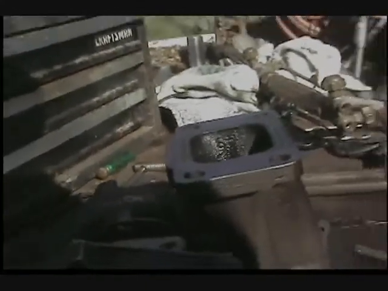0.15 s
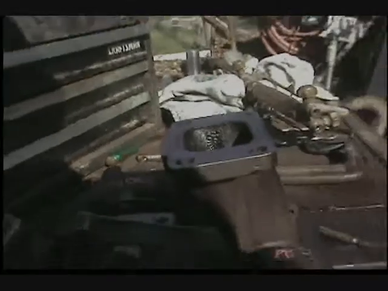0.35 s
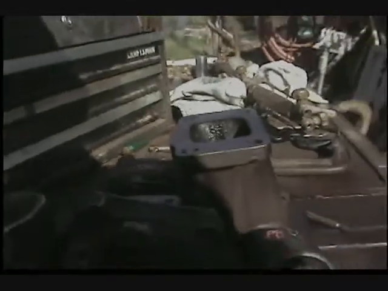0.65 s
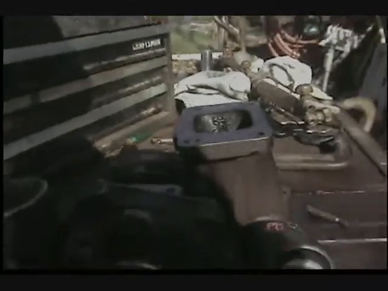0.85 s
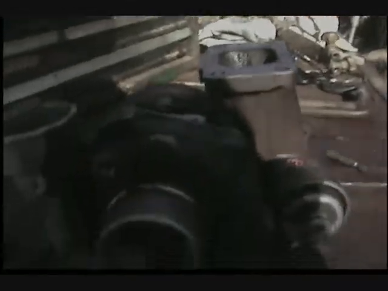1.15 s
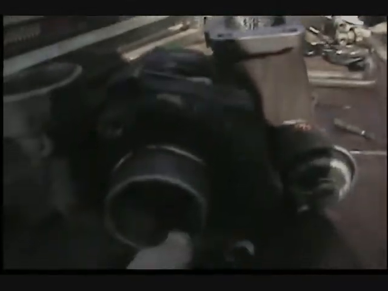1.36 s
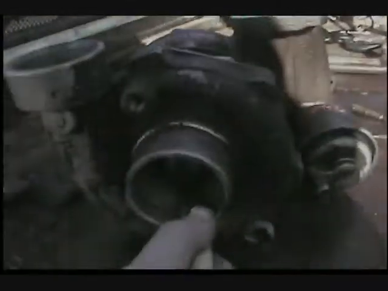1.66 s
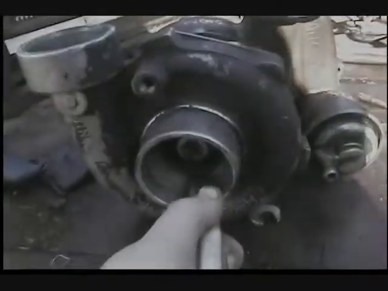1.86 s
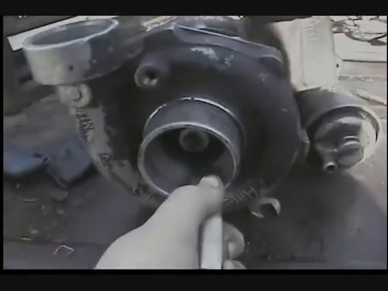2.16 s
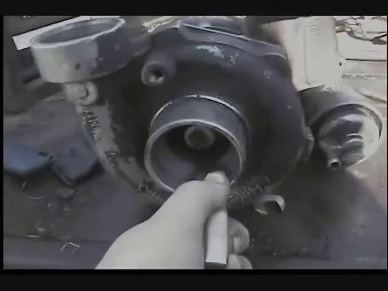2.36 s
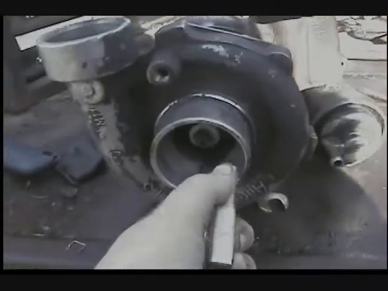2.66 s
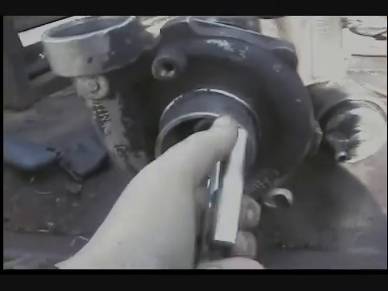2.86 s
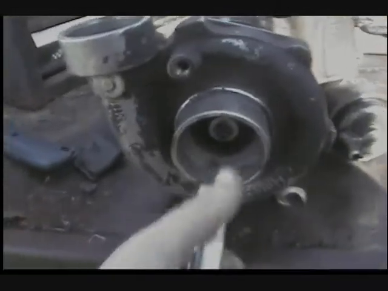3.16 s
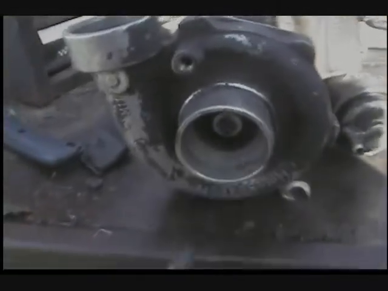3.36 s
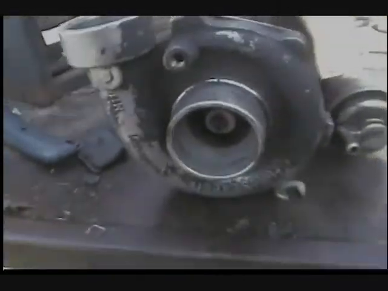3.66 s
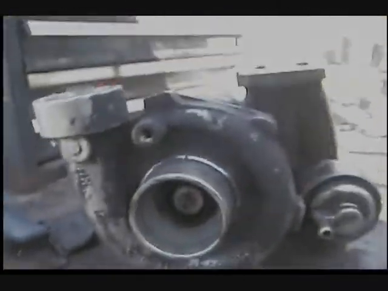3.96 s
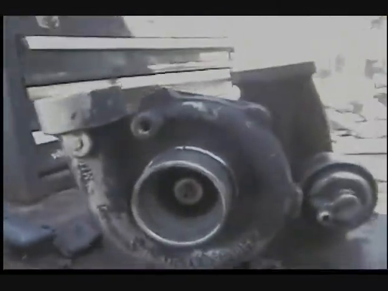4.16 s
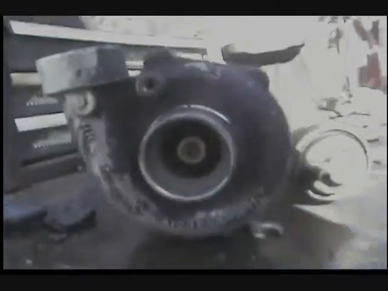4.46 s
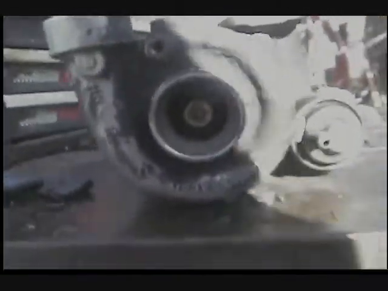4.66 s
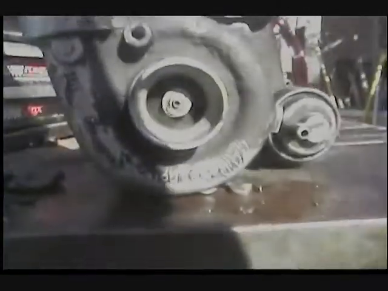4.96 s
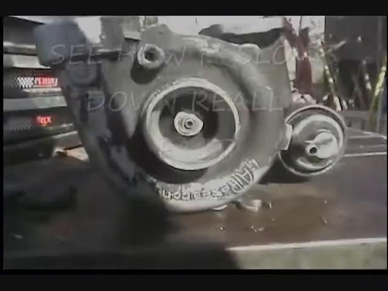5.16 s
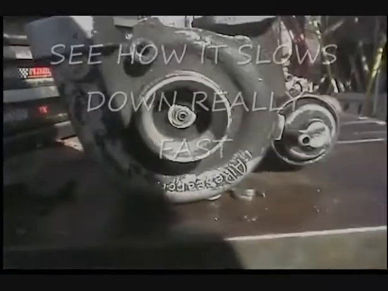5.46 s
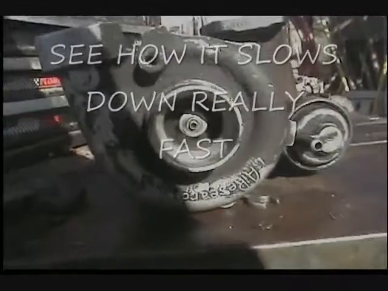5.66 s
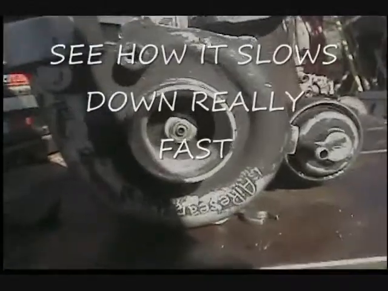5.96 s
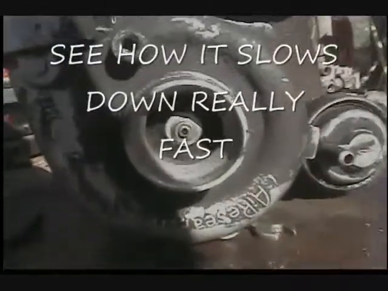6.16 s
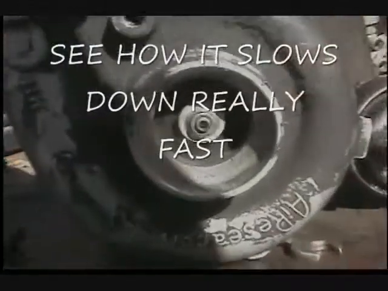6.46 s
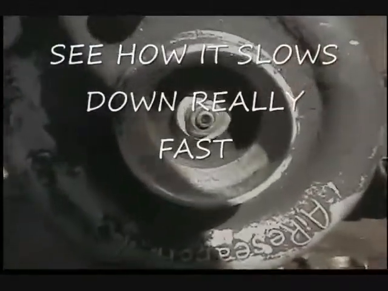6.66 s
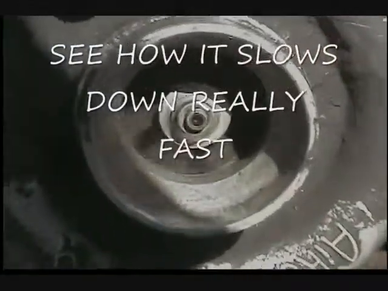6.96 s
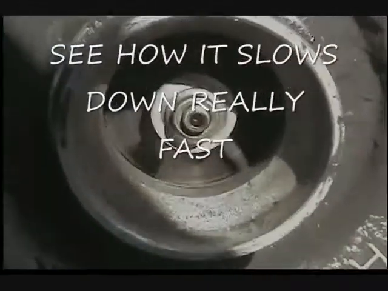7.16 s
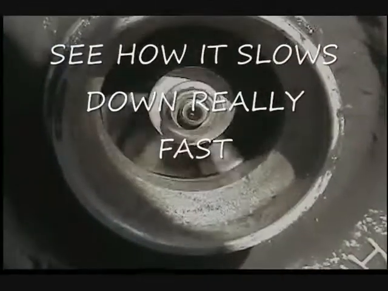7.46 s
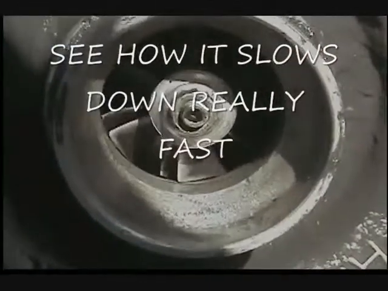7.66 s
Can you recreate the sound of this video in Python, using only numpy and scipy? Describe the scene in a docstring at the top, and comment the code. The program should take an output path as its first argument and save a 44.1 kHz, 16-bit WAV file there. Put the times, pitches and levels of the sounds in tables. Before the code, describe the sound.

Loud compressed-air hiss roars into a humming metal turbocharger wheel, cuts off abruptly, then a clattering piston compressor grows louder, with occasional sharp ticks.

```python
"""Air gun on a turbocharger wheel

A motor-driven piston compressor runs across the yard: knocks repeat every turn, valve plates ring, noise
swells on the strokes, and the motor hums. Close to the camera an air gun hisses and roars into a
turbocharger wheel, whose hum slowly falls, until the gun is shut off. The camera's gain control, pulled
down by the hiss, climbs back afterwards. A few sharp ticks pass over the hum.
"""
import sys
import numpy as np
from scipy import signal
from scipy.fft import rfft, irfft, next_fast_len
from scipy.io import wavfile
from scipy.ndimage import uniform_filter1d, map_coordinates

SR = 44100
rng = np.random.default_rng(int(sys.argv[2]) if len(sys.argv) > 2 else 0)


def dump(signal):
    """Clip the signal to [-1, 1] and save it as 16-bit WAV at the path in sys.argv[1]."""
    limited = np.clip(np.atleast_2d(signal).T, -1, 1)
    pcm = np.round(limited * 32767).astype(np.int16)
    wavfile.write(sys.argv[1], SR, pcm)


def makeup_ratio(level_db):
    """Linear amplitude ratio for a level in decibels (20 dB per factor of ten)."""
    decades = np.asarray(level_db, float) / 20
    return 10 ** decades


N = 344421


def unit(x):
    """Scale to rms 1."""
    return x / np.sqrt(np.mean(x ** 2) + 1e-20)


def along(points, hz):
    """Read (Hz, value) points on a log frequency axis."""
    f, v = np.transpose(points)
    return np.interp(np.log(hz + 1), np.log(f + 1), v)


def curves(rows):
    """One value per sample for each column after the time."""
    s, *columns = np.transpose(rows)
    return [np.interp(np.arange(N) / SR, s, column) for column in columns]


def wobble(rate):
    """A smooth random curve through normally distributed knots, rate of them a second."""
    knots = rng.standard_normal(int(N * rate / SR) + 4)
    return map_coordinates(knots, [np.arange(N) * rate / SR])


def filtered(x, response):
    """Multiply the spectrum of x by a response of frequency."""
    m = next_fast_len(N + 8192)
    return irfft(rfft(x, m) * response(np.fft.rfftfreq(m, 1 / SR)), m)[..., :N]


def rush(gain, patchy_db):
    """Noise of rms 1 with a colour, and a random gain in patches of time and frequency."""
    z = signal.stft(rng.standard_normal(N), nperseg=512)[2]
    field = uniform_filter1d(rng.standard_normal(z.shape), 6, 0)
    field = unit(uniform_filter1d(field, 10, 1))
    noise = signal.istft(z * makeup_ratio(patchy_db * field), nperseg=512)[1][:N]
    return unit(filtered(noise, gain))


def lifted(spectrum, peaks, lift):
    """A noise colour raised at a few resonances."""
    def response(hz):
        boost = 1 + sum(lift / (1 + ((hz - c) / w) ** 2) for c, w in peaks)
        return makeup_ratio(along(spectrum, hz)) * boost
    return response


# Knocks of piston, pipe and tank, once a turn. Each row: share of a turn (0-1), ring in Hz, t60 in seconds,
# relative level in dB with the camera high, the same with it low (both before the treble tilt).
PUMP_KNOCKS = [(.177, 651, .028, 3.4, 6.6), (.185, 1247, .039, -6.2, -6.6), (.257, 872, .05, -10.8, -1.5),
               (.303, 582, .15, 4.6, 5), (.307, 1144, .012, -.3, 1.4), (.353, 327, .081, 4.8, 5.1),
               (.44, 618, .043, 3.2, 4.4), (.464, 1453, .02, -30, -3.5), (.484, 2470, .05, -30, -14),
               (.604, 366, .124, 5.6, 3.5), (.621, 691, .121, -5.3, -19), (.805, 453, .15, -4.1, -5.8),
               (.861, 1188, .127, -12, -17), (.932, 838, .141, -12.3, -11.2), (.933, 482, .15, -7.6, -7.1),
               (.985, 1541, .077, -13.5, -8.8), (.99, 2470, .05, -30, -14), (.999, 242, .15, -10, -9)]
# Lowest pressure tones. Each row: multiple of shaft speed, level in dB against all the knocks.
PRESSURE_TONES = [(3, -51), (4, -38.5), (5, -47), (6, -33), (7, -37.5)]
# Fine tones of small parts. Each row: frequency in Hz, mean level in dB a tone with the camera low,
# against all the knocks.
FINE_TONES = [(1000, -44), (1150, -38), (1280, -38), (1750, -30.5), (2100, -37.5), (2500, -34.5),
              (2750, -46)]


def pump(turn, view):
    """Every turn repeats the same knocks, each ringing in its own part of the pump."""
    order = np.arange(100)  # multiples of shaft speed
    share, hz, t60, db_high, db_low = np.transpose(PUMP_KNOCKS)[:, :, None]
    tone_hz = order * np.mean(SHAFT_SPEED, 0)[1]
    s, w, damping = 2j * np.pi * tone_hz, 2 * np.pi * hz, np.log(1000) / t60
    rise_s, bass_cut_hz = .0003, 230  # little radiates below the bass cut

    def ring(damping):
        return w / ((s + damping) ** 2 + w * w)

    knock = ring(damping) - ring(damping + 1 / rise_s)
    knock = knock * np.exp(-2j * np.pi * share * order)
    # treble tilt of the knocks: 2.5 dB per kHz
    tilted = (s / (s + 2 * np.pi * bass_cut_hz)) ** 2 * makeup_ratio(2.5 * tone_hz / 1000)
    tilted = tilted * (order > PRESSURE_TONES[-1][0])

    random_phase = np.exp(2j * np.pi * rng.random(len(order)))
    scatter_db = 2.5 * rng.standard_normal(len(order))
    fine = makeup_ratio(along(FINE_TONES, tone_hz) + scatter_db) * (tone_hz > FINE_TONES[0][0])
    deep = sum(makeup_ratio(db) * (order == round(k)) for k, db in PRESSURE_TONES)

    spectra = []
    for db, fine_db in [(db_high, -1), (db_low, 0)]:
        z = tilted * (makeup_ratio(db) * knock).sum(0)
        z = z / np.linalg.norm(z)  # the knocks together have rms 1
        spectra.append(np.sqrt(2) * (z + (deep + makeup_ratio(fine_db) * fine) * random_phase))

    size, out = 4096, 0  # points in the waveform of one turn
    for low, high in [(0, 14), (14, 25), (25, 45), (45, 99)]:  # bands of tones shake on their own
        shaken = (turn + .0007 * wobble(25)) % 1  # strokes differ slightly in timing
        band = (order > low) & (order <= high)
        cycles = [irfft(z * band, size) * size / 2 for z in spectra]
        above, level = (np.interp(shaken, np.arange(size) / size, c, period=1) for c in cycles)
        out = out + makeup_ratio(0.36 * wobble(22)) * ((1 - view) * above + view * level)
    return out


def valves(turn, plates):
    """Each plate strikes its seat once a turn, a little early or late, harder or softer."""
    out, t = np.zeros(N), np.arange(1024) / SR
    count = int(N / SR * 30)  # enough turns for the whole scene
    for share, hz, t60, db in plates:
        chance = rng.standard_normal((count, 2))
        late = .0012 * chance[:, 0]  # in turns
        strike_turn = np.floor(turn[0]) + np.arange(count) + share + late
        at = np.interp(strike_turn, turn, np.arange(N))
        force = makeup_ratio(db + 2 * chance[:, 1]) * (at > 0) * (at < N - 1)
        blows = np.bincount(at.astype(int), force, N)
        ring = makeup_ratio(-60 * t / t60) * (1 - np.exp(-t / 0.00037)) * np.sin(2 * np.pi * hz * t)
        out += signal.fftconvolve(blows, ring)[:N]
    return unit(out)


# Colour of the air and metal noise; the step up above 11 kHz is not the pump's own.
# Each row: frequency in Hz, relative density in dB per Hz.
RATTLE_COLOUR = [(24, -83), (60, -38), (200, -24), (400, -21), (620, -4.5), (800, -20.5), (1000, -19),
                 (1150, -18.5), (1290, -22.5), (1600, -18), (1900, -19.5), (2100, -27), (2500, -20.5),
                 (3500, -22), (6000, -21.5), (7200, -29.5), (11000, -36.5), (11500, -30.5), (15700, -35)]
# Head and tank resonances that lift it. Each row: centre in Hz, half width in Hz before a 0.98 scaling,
# lift in dB before a 0.66 scaling of its amplitude.
HEAD_RESONANCES = [(1470, 57, -28), (2520, 37, -12), (3180, 470, -8), (4280, 210, -3.5), (4975, 16, 10),
                   (5270, 37, 9), (5820, 170, -3.5)]


def rattle(turn):
    """Air and loose metal noise, swelling on both strokes of the piston."""
    def colour(hz):
        lift = 1 + sum(0.66 * makeup_ratio(db) / (1 + ((hz - c) / (0.98 * w)) ** 2) for c, w, db in HEAD_RESONANCES)
        return makeup_ratio(along(RATTLE_COLOUR, hz)) * lift

    angle = 2 * np.pi * (turn - .37)
    strokes_db = 1.94 * np.cos(2 * angle) + 0.2 * np.cos(angle)
    return unit(makeup_ratio(strokes_db) * rush(colour, patchy_db=0.5))


# Compressor shaft. Each row: time in seconds, speed in turns per second.
SHAFT_SPEED = [(0, 28.582), (7.8, 28.553)]
# The camera sinks to the level of the bench. Each row: time in seconds, how far lowered (0-1).
CAMERA_HEIGHT = [(0, 0.34), (2.8, 0.19), (3.8, 0.35), (4.15, 0.42), (4.3, .48), (4.5, 0.59), (4.7, 0.8),
                 (4.9, 0.93), (7.8, 0.9)]
# What reaches it at each height. Each row: how far lowered (0-1), pump in dB, four valve groups in dB,
# rattle in dB, all before the shielding.
HEIGHT_LEVELS = [(0, -28, -37, -50, -52, -60, -42), (.45, -33.5, -57.5, -47, -51, -58, -42.5),
                 (.6, -33.5, -55.5, -54, -45.5, -53, -41), (1, -32.5, -51.5, -57, -56.5, -50.5, -40)]
# Valve plates in four groups. Each row: share of a turn (0-1), ring in Hz, t60 in seconds,
# mean level in dB within the group.
VALVE_GROUPS = [
    [(0.05, 2200, 0.047, -5.5), (.94, 2390, .015, -2.5), (.38, 2540, 0.023, 0), (0.7, 2700, 0.023, -9)],
    [(.93, 2700, 0.034, 0.5), (0, 2420, 0.037, -2.5), (.45, 3000, 0.027, -5), (.52, 2700, 0.019, -3)],
    [(0.92, 2870, 0.037, 0), (.06, 2290, 0.022, -4), (.45, 2500, 0.034, -3.5)],
    [(0.9, 4270, 0.024, 0.5), (.05, 4150, 0.0084, 5.5), (.46, 4300, .012, 3.5), (0.5, 6800, 0.0048, -1),
     (.84, 6060, 0.0046, -8.5), (0, 1460, 0.003, -13), (.45, 1390, 0.011, -11.5)],
]
# The compressor is partly shielded until the camera has swung round. Each row: time in seconds, gain in dB.
SHIELDING = [(0, -10.5), (1.6, -6.5), (2.8, 0)]


def compressor():
    """Pump, valves and rattle share one shaft; the motor hums at twice the mains."""
    turn = np.cumsum(curves(SHAFT_SPEED)[0]) / SR
    turn = turn - turn[round(3.695 * SR)]  # the main valve strikes at 3.695 s: turns count from there
    view = np.clip(curves(CAMERA_HEIGHT)[0], 0, 1)
    height, *levels = np.transpose(HEIGHT_LEVELS)
    pump_db, *clack_db, rattle_db = (np.interp(view, height, db) for db in levels)

    machine = makeup_ratio(pump_db) * pump(turn, view)
    machine = machine + sum(makeup_ratio(db) * valves(turn, plates) for db, plates in zip(clack_db, VALVE_GROUPS))
    machine = machine + makeup_ratio(rattle_db) * rattle(turn)
    hum = makeup_ratio(-65) * np.sin(2 * np.pi * 120 * np.arange(N) / SR)
    return makeup_ratio(curves(SHIELDING)[0]) * machine + hum


def turbine():
    """The spun-up wheel hums once a turn, slightly unsteady and slowing, until the gun is shut off."""
    t = np.arange(N) / SR
    turns_per_s = 618 - 39 * t + 1.4 * wobble(11.9)
    phase = 2 * np.pi * np.cumsum(turns_per_s) / SR
    db = -39 - 10 * np.maximum(t - 1.1, 0) + 2 * wobble(9.9)  # fades as the view swings
    octave = makeup_ratio(-2 - 25 * t) * np.sin(2 * phase)  # soon lost
    return (t < GUN_HISS[-1][0]) * np.sqrt(2) * makeup_ratio(db) * (np.sin(phase) + octave)


# The camera swings round the inlet. Each row: time in seconds, aim from the first view to the second (0-1).
CAMERA_AIM = [(0, .02), (1.1, .1), (1.5, .85), (2.7, .98)]
# Air gun. Each row: time in seconds, hiss level in dB before the flutter.
GUN_HISS = [(0, -8.5), (1.2, -7), (2.1, -2.5), (2.69, -5.5), (2.708, -6), (2.718, -14.5), (2.726, -59),
            (2.732, -77)]
# Inlet resonances, one list for each view. Each row: centre in Hz, half width in Hz.
INLET_RESONANCES = [
    [(4500, 80), (5000, 90), (8160, 370), (12500, 230), (13400, 140)],
    [(2720, 91), (6030, 80), (8160, 71), (10800, 260), (12500, 400), (13200, 300)],
]
# Hiss colour in the first view. Each row: frequency in Hz, relative density in dB per Hz.
FIRST_COLOUR = [(1180, -47), (2000, -18), (2340, -15), (2700, -10.5), (3560, -11), (4460, -6), (5030, -6),
                (5480, -8.5), (6690, -12.5), (7950, -6), (8590, -6.5), (11300, -6.5), (12900, 0.5),
                (15200, -2), (15700, -13.5)]
# Hiss colour in the second view. Each row: frequency in Hz, relative density in dB per Hz.
SECOND_COLOUR = [(1180, -48), (2000, -17), (2420, -12.5), (2700, -9), (3300, -9.5), (4000, -3.5),
                 (4600, -6), (5500, -11), (6600, -8), (8000, -5), (9000, -6.5), (11200, -4), (12200, -2),
                 (13900, -4), (14600, 2.5), (15700, -11)]
# Low roar of the jet in the housing. Each row: frequency in Hz, relative density in dB per Hz.
ROAR_COLOUR = [(15, -52), (30, -35), (100, -24), (200, -14.5), (320, -10), (600, -5), (1000, -5.5),
               (1500, -3.5), (2200, -3.5), (2900, -27), (4800, -120)]


def air_gun():
    """The jet hisses on the blades and roars in the housing; the colour of the hiss follows the aim."""
    hiss_db = curves(GUN_HISS)[0]
    aim = np.clip(curves(CAMERA_AIM)[0], 0, 1)
    first = rush(lifted(FIRST_COLOUR, INLET_RESONANCES[0], lift=0.1), patchy_db=0)
    second = rush(lifted(SECOND_COLOUR, INLET_RESONANCES[1], lift=0.61), patchy_db=1)
    hiss = np.sqrt(1 - aim) * first + np.sqrt(aim) * second
    roar = makeup_ratio(-19) * rush(lambda hz: makeup_ratio(along(ROAR_COLOUR, hz)), patchy_db=0.35)
    flutter_db = .5 * wobble(29.73) + 0.25 * wobble(8)
    is_open = np.arange(N) < GUN_HISS[-1][0] * SR  # then the trigger is let go
    return is_open * makeup_ratio(hiss_db + flutter_db) * (hiss + roar)


def scene():
    """One microphone feeds both channels."""
    return np.tile(compressor() + turbine() + air_gun(), (2, 1))


def gain_control(x, target_db, most_db, climb_db):
    """Gain drops at once for loud sound and climbs back at a steady rate in dB per second."""
    level_db = 10 * np.log10(np.abs(uniform_filter1d(x[0] ** 2, 4410)) + 1e-12)
    wanted_db = np.minimum(target_db - level_db, most_db)
    ramp_db = climb_db * np.arange(N) / SR
    gain_db = np.minimum.accumulate(wanted_db - ramp_db) + ramp_db
    return x * makeup_ratio(uniform_filter1d(gain_db, 2205))


# Sharp ticks. Each row: time in seconds, peak in dB before the band limit.
TICK_PEAKS = [(3.7155, 0.5), (4.6064, -3), (6.532, -2), (6.9303, -0.5), (7.703, 0)]


def ticks():
    """Single-sample negative spikes."""
    out = np.zeros(N)
    for s, db in TICK_PEAKS:
        out[round(s * SR)] = -makeup_ratio(db)
    return out


def band_limit(x):
    """A steep low-pass at the top of the band."""
    return signal.sosfilt(signal.butter(12, 16760, fs=SR, output="sos"), x)


def record(dry):
    """Gain control rides the scene, ticks are added, then the band is limited and peaks clip."""
    x = gain_control(dry, target_db=-8.5, most_db=16.5, climb_db=13.5) + ticks()
    x = filtered(x, lambda hz: hz < 15750)
    mix = np.clip(x, -1, 1)
    return band_limit(mix)


dry = scene()
out = record(dry)
dump(out)
```